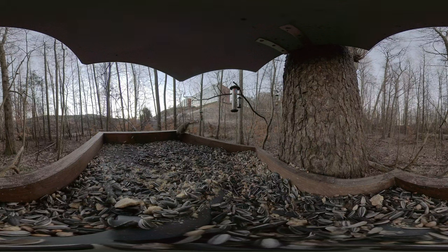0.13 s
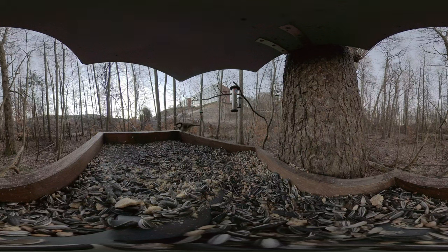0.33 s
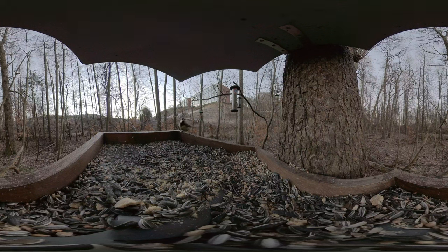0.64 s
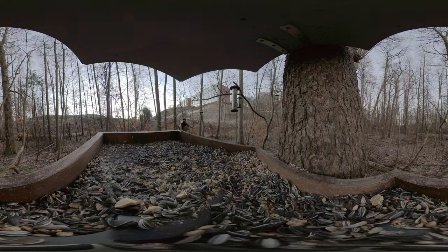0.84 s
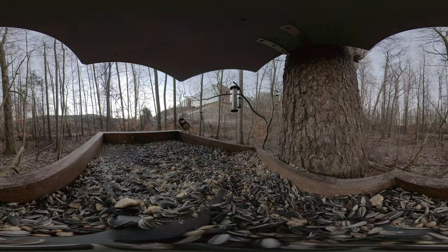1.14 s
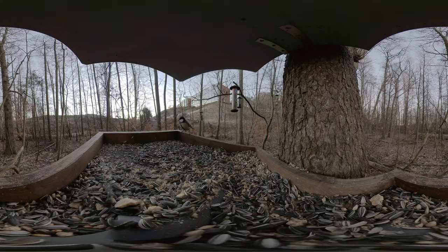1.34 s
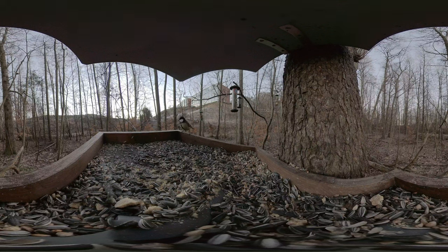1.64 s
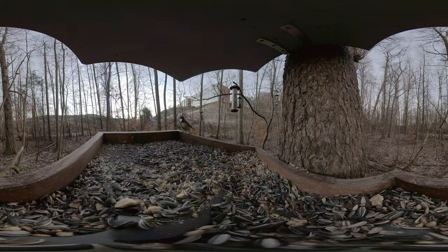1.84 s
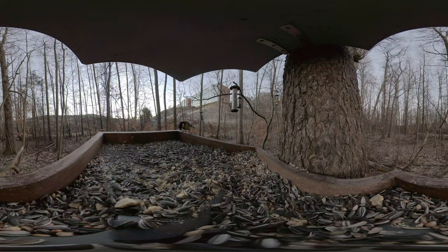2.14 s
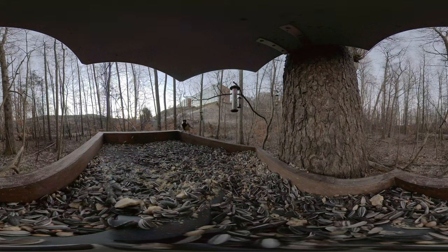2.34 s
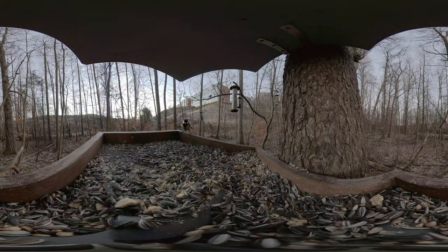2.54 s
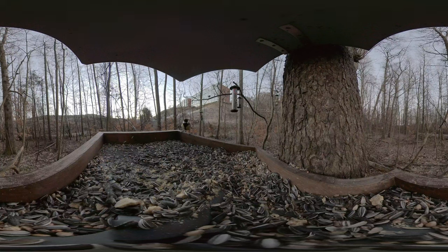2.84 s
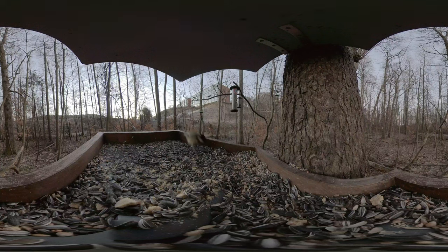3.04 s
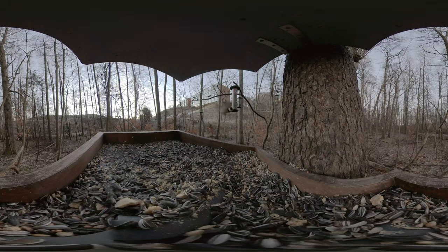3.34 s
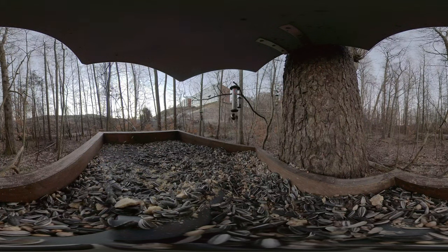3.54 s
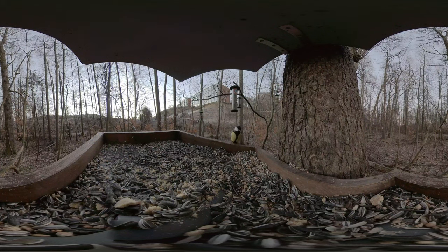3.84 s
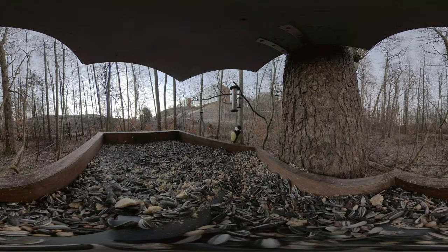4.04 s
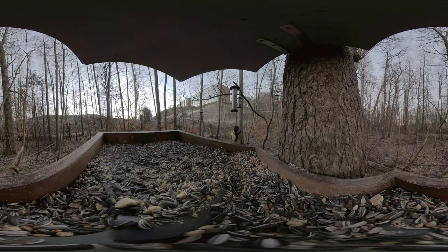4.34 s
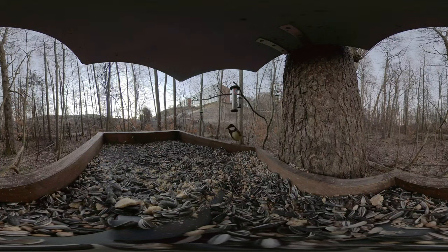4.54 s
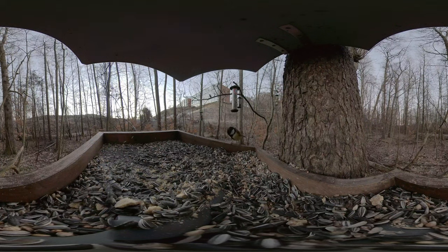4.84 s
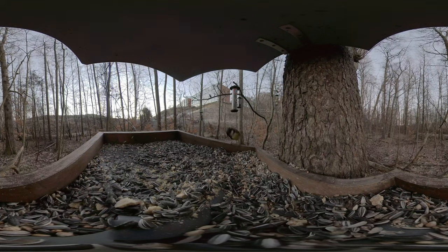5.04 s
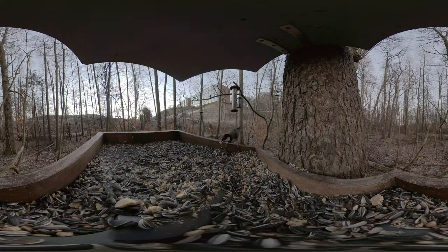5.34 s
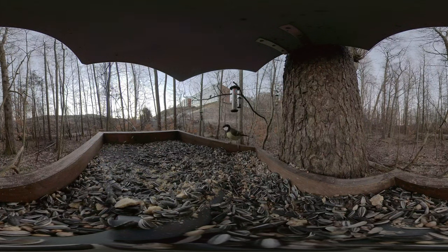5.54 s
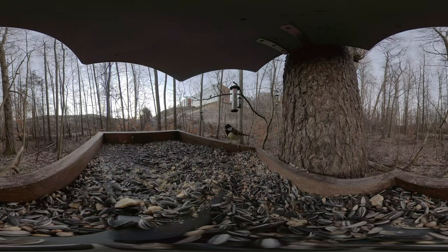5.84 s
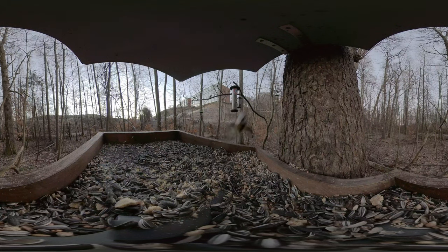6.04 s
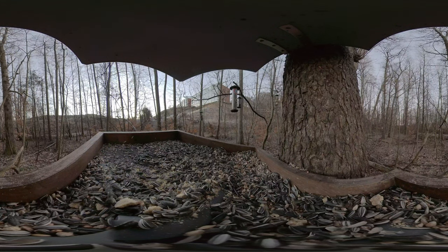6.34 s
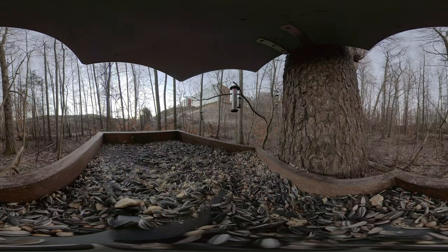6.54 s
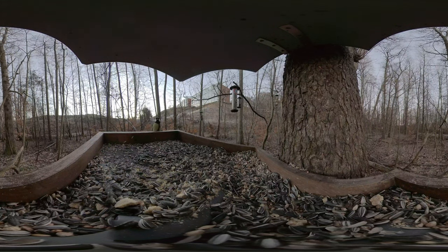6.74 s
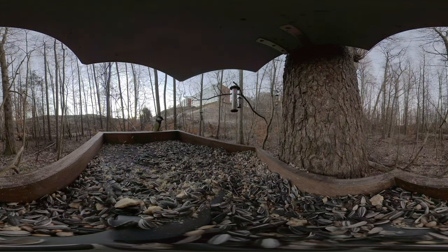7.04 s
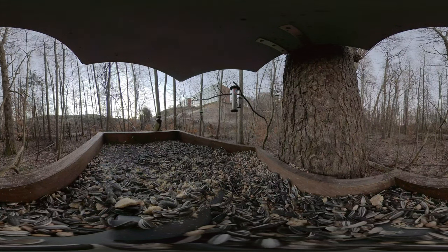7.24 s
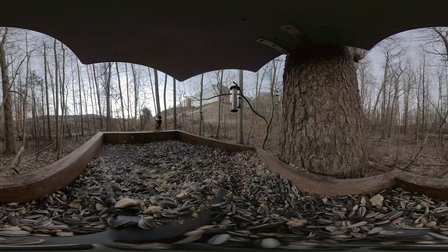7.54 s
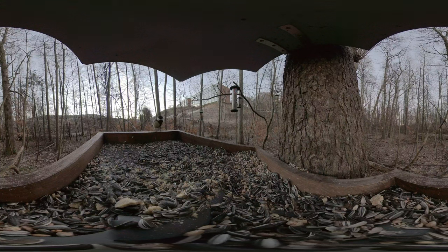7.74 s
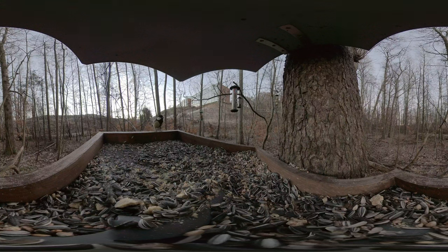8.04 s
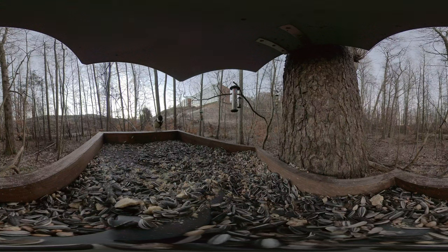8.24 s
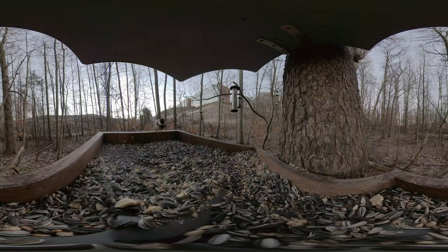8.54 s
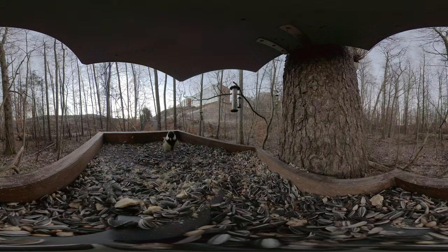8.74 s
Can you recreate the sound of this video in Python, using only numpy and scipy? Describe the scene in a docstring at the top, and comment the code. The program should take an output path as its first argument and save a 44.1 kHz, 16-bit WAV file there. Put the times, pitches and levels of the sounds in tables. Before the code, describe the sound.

Dry seed snaps, light foot knocks on wood and quick wingbeats sound close up, with faint chirps and a far-off vehicle late on.

```python
"""A faint scrape and a dry snap over a low outdoor rush: small birds at a wooden seed tray, close by.
Beaks crack husks, feet knock the tray into ringing, claws drag on the rim, wingbeats push pulses of air.
The rush swells and sinks around their activity; faint chirps come from the winter trees.
Late on, a distant vehicle comes into earshot with rumble, road roar, tyre noise and engine hum."""
import sys
import numpy as np
from scipy import signal
from scipy.fft import rfft, irfft, next_fast_len
from scipy.io import wavfile
from scipy.ndimage import map_coordinates

SR = 44100
rng = np.random.default_rng(int(sys.argv[2]) if len(sys.argv) > 2 else 0)


def file_out(sig):
    """Save sig as 16-bit WAV at sys.argv[1]."""
    # one column per channel
    cols = np.atleast_2d(sig).T
    # limit, then scale
    lim = np.clip(cols, -1, 1)
    pcm = np.round(lim * 32767).astype(np.int16)
    wavfile.write(sys.argv[1], SR, pcm)


N = 392490


def amp(db):
    """Decibels to gain."""
    return 10 ** (np.asarray(db) / 20)


def unit_rms(x):
    """Scale to rms 1."""
    return x / np.sqrt(np.mean(x ** 2) + 1e-20)


def along(points, hz):
    """Interpolate (frequency [Hz], value) points on a log axis."""
    knots_hz, values = np.transpose(points)
    return np.interp(np.log(hz + 1), np.log(knots_hz + 1), values)


def wobble(rate_hz, size=N):
    """Smooth random curve, rate_hz knots a second."""
    knots = rng.standard_normal(int(size * rate_hz / SR) + 4)
    return map_coordinates(knots, [np.arange(size) * rate_hz / SR])


def filtered(x, response):
    """Zero-phase filter with gain response(hz)."""
    size = x.shape[-1]
    padded = next_fast_len(size + SR // 10)
    gain = response(np.fft.rfftfreq(padded, 1 / SR))
    return irfft(rfft(x, padded) * gain, padded)[..., :size]


def pan(left_minus_right_db):
    """Left and right gains, mean 1."""
    gains = amp(np.array([[.5], [-.5]]) * left_minus_right_db)
    return gains / gains.mean(axis=0)


def noise(spectrum, coherence, size=N):
    """Coloured stereo noise, rms 1; left-right coherence is a number or a table over frequency."""
    def response(hz):
        likeness = coherence if np.isscalar(coherence) else along(coherence, hz)
        angle = np.arccos(np.clip(likeness, 0, 1)) / 2
        return amp(along(spectrum, hz)) * np.array([np.cos(angle), np.sin(angle)]).reshape(2, -1)
    mid, side = filtered(rng.standard_normal((2, size)), response)
    return unit_rms(np.array([mid + side, mid - side]))


def add(track, at_s, sound):
    """Mix a sound into the track."""
    part = track[:, max(round(at_s * SR), 0):][:, :sound.shape[-1]]
    part += sound[..., :part.shape[1]]


# Swells of the rush: (time [s], hold [s], level [dB])
RUSH_SWELLS = [(0.121, 0.069, -53), (0.281, 0.078, -49.5), (0.498, 0.34, -52), (1.041, 0.27, -52.5),
               (1.492, 0.35, -51.5), (1.967, 0.049, -51), (2.266, .29, -51.5), (3.107, 0.031, -53),
               (3.183, 0.89, -48.5), (4.494, 0.14, -53), (5.219, 0.35, -50), (5.972, 0.12, -60),
               (6.13, 0.17, -50), (6.476, 0.077, -50.5)]
def rush_gain(rise_s=0.014, sag_db_per_s=4, sink_db_per_s=111, calm_db=-65):
    """Each swell rises fast, sags a little, then sinks back to calm."""
    t = np.arange(N) / SR
    swells = []
    for at_s, hold_s, db in RUSH_SWELLS:
        rise = np.clip((t - at_s) / rise_s, 0, 1)
        sag_db = sag_db_per_s * np.maximum(t - at_s, 0)
        sink_db = sink_db_per_s * np.maximum(t - at_s - hold_s, 0)
        swells.append(rise * amp(db - sag_db - sink_db))
    return np.hypot(np.max(swells, axis=0), amp(calm_db))


# Low rush and fine hiss: (frequency [Hz], density [dB])
RUSH_SPECTRUM = [(25, -21.5), (50, 5.5), (80, 0.5), (170, -7), (270, -4.5), (400, -9), (600, -11),
                 (1000, -16.5), (1500, -24), (2500, -34), (5000, -45.5), (9000, -52)]
HISS_SPECTRUM = [(1200, -16), (2000, -3), (4200, -5), (5300, -28), (6500, -17.5), (8000, -11), (9500, 1),
                 (11500, -0.5), (13300, -1), (14200, -5.5), (16000, -4)]
# Rush balance: (frequency [Hz], left minus right [dB])
RUSH_PAN = [(60, -8), (150, -3.5), (380, -5.5), (950, -3), (2380, -5.5), (5980, -1), (9500, -5.5),
            (15000, -8.5)]
# Background width: (frequency [Hz], left-right coherence [0..1])
OUTDOOR_COHERENCE = [(60, 0.29), (150, 0.093), (380, 0.78), (950, 0.73), (2380, 0.069), (5980, 0.36),
                     (15000, 0.99)]
def outdoor_rush():
    """Low rush that swells and sinks; its hiss swings further than its bass."""
    gain = rush_gain()
    hiss_gain = gain.max() * (gain / gain.max()) ** 1.13
    bass = gain * amp(1.5 + 0.27 * wobble(30)) * noise(RUSH_SPECTRUM, OUTDOOR_COHERENCE)
    hiss = hiss_gain * amp(-15 + .6 * wobble(40)) * noise(HISS_SPECTRUM, OUTDOOR_COHERENCE)
    return filtered(bass + hiss, lambda hz: pan(along(RUSH_PAN, hz)))


# Road roar contour: (time [s], level [dB])
ROAR_LEVELS = [(6.4, -71.5), (6.53, -56.5), (6.72, -61), (6.86, -53), (7.03, -47.5), (7.13, -51.5),
               (7.42, -57), (7.62, -50), (7.78, -55.5), (8.14, -52.5), (8.5, -59.5), (8.66, -54.5),
               (8.9, -59.5)]
def vehicle_gains(arrival_s=6.224, rise_s=0.57, tyre_growth_db_per_s=2.37):
    """Rumble, roar and tyre gains: the tyres follow the roar closely, the rumble hardly."""
    t = np.arange(N) / SR
    since_s = np.maximum(t - arrival_s, 0)
    fade_in = np.minimum(since_s / rise_s, 1)
    times_s, levels_db = np.transpose(ROAR_LEVELS)
    roar_db = np.interp(t, times_s, levels_db)
    swing_db = roar_db - np.median(levels_db)
    rumble = fade_in * amp(-53.5 + 0.17 * swing_db)
    roar = np.sqrt(fade_in) * amp(roar_db)
    tyres = np.sqrt(fade_in) * amp(-65.5 + 0.82 * swing_db + tyre_growth_db_per_s * since_s)
    return rumble, roar, tyres


# Vehicle noise bands: (frequency [Hz], density [dB])
RUMBLE_SPECTRUM = [(25, -20), (50, 5.5), (75, 4.5), (110, 0.5), (160, -4.5), (250, -1), (335, -2.5),
                   (450, -6.5), (650, -16), (1200, -57)]
ROAR_SPECTRUM = [(300, -17), (500, 7.5), (700, 11), (900, 9), (1100, 8.5), (1400, 4), (1900, -31),
                 (3000, -70)]
DRONE_SPECTRUM = [(450, -32), (680, 5.5), (760, 11), (860, -10), (1200, -37)]
TYRE_SPECTRUM = [(800, -55), (1300, 1), (1600, 3.5), (2200, -4.5), (3200, -10), (4500, -23), (6500, -39),
                 (9000, -52)]
# Engine hum: (frequency [Hz], level [dB])
ENGINE_LINES = [(54, -68), (70, -50), (89, -52), (110, -68), (331, -59.5)]
# Vehicle balance: (frequency [Hz], left minus right [dB])
VEHICLE_PAN = [(60, -10), (150, -4.5), (380, -5.5), (950, -2.5), (2380, -10), (5980, -1), (11000, -7.5),
               (15000, -6)]
def vehicle():
    """Distant rumble, road roar and tyre noise over a slightly unsteady engine hum."""
    rumble, roar, tyres = vehicle_gains()
    drone = roar * (roar / roar.max()) ** 0.99  # stands out at the roar's peaks
    sound = rumble * amp(4.5 + 0.097 * wobble(26)) * noise(RUMBLE_SPECTRUM, OUTDOOR_COHERENCE)
    sound += roar * amp(1.5 + 2.1 * wobble(10)) * noise(ROAR_SPECTRUM, OUTDOOR_COHERENCE)
    sound += drone * amp(-2.5) * noise(DRONE_SPECTRUM, OUTDOOR_COHERENCE)
    sound += tyres * amp(3 + 0.22 * wobble(8)) * noise(TYRE_SPECTRUM, OUTDOOR_COHERENCE)
    sound += np.sqrt(rumble * roar) * amp(-13 + wobble(54)) * noise(HISS_SPECTRUM, OUTDOOR_COHERENCE)
    engine_time_s = np.cumsum(1 + 0.00791 * wobble(7)) / SR
    hum = sum(amp(db + wobble(2.35)) * np.sin(2 * np.pi * hz * engine_time_s) for hz, db in ENGINE_LINES)
    sound += hum * tyres / np.percentile(tyres, 90)
    return filtered(sound, lambda hz: pan(along(VEHICLE_PAN, hz)))


# Whistled notes: (time [s], length [s], start pitch [Hz], end pitch [Hz], level [dB])
CHIRP_NOTES = [(.708, 0.011, 6400, 6230, -63), (.730, 0.017, 5580, 5140, -66),
               (1.692, .12, 4550, 4420, -73.5), (1.933, .11, 4410, 4400, -76.5),
               (4.608, 0.028, 3850, 3780, -67), (4.624, 0.011, 3840, 1990, -61.5)]
def tree_chirps(echo_t60_s=0.15):
    """Short falling whistles, blurred by echoes among the trunks."""
    out, t = np.zeros((2, N)), np.arange(SR // 4) / SR
    for at_s, length_s, start_hz, end_hz, db in CHIRP_NOTES:
        progress = np.linspace(0, 1, int(length_s * SR))
        glide_hz = start_hz + (end_hz - start_hz) * progress
        pitch_hz = glide_hz * (1 + 0.011 * wobble(156, len(progress)))
        note = amp(db) * np.sin(np.pi * progress) * np.sin(2 * np.pi * np.cumsum(pitch_hz) / SR)
        trunks = rng.standard_normal((2, len(t))) * amp(-60 * t / echo_t60_s)
        echoes = signal.fftconvolve(note[None], trunks / np.linalg.norm(trunks[0]))
        add(out, at_s, amp(0.5) * note)
        add(out, at_s, amp(-2.5) * echoes)
    return out * pan(-7)


# Decay under the feeder roof: (frequency [Hz], t60 [s])
ROOF_DECAY = [(200, 0.12), (2000, 0.045), (12000, 0.0059)]
def roof_echo(x):
    """The small space between tray and roof rings briefly."""
    hz, t, bins = signal.stft(rng.standard_normal((2, SR // 5)), SR, nperseg=256)
    decay = amp(-60 * t / along(ROOF_DECAY, hz)[:, None])
    _, tail = signal.istft(bins * decay, SR, nperseg=256)
    return signal.fftconvolve(x, tail / np.linalg.norm(tail[0]), axes=1)[:, :N]


# Seed shell, ticking or cracking: (frequency [Hz], density [dB])
SHELL_SPECTRUM = [(900, -32), (1900, -10.5), (2800, -7.5), (4200, -8.5), (5400, -19.5), (7000, -16),
                  (8800, -3), (10500, -1.5), (12500, 2), (16000, -4.5)]
def loose_husks(count=130, attack_s=.0006, t60_s=0.028):
    """Husks shift with tiny random ticks, scaled by the rush and the vehicle's rumble."""
    out, t = np.zeros((2, N)), np.arange(SR // 80) / SR
    rumble, _, _ = vehicle_gains()
    background = rush_gain() + 1.1 * rumble
    envelope = (1 - np.exp(-t / attack_s)) * amp(-60 * t / t60_s)
    for place, strength in rng.random((count, 2)):
        start = int(place * N)
        tick = noise(SHELL_SPECTRUM, 0.62, len(t)) * envelope
        add(out, start / SR, background[start] * amp(-8.5 + 4.9 * strength) * tick)
    return out * pan(1.5)


# Wingbeat bursts: (centre time [s], fade each side [s], air push [dB], eddies [dB], feathers [dB])
FLUTTER_BURSTS = [(0.154, 0.0068, -53, -50.5, -66), (0.324, .018, -44, -63, -78),
                  (2.316, .005, -48, -49, -66), (2.435, 0.0095, -44, -42, -61),
                  (2.494, 0.043, -46, -48, -64.5), (3.316, 0.018, -17, -25, -38.5),
                  (3.384, 0.024, -30.5, -50, -53.5), (3.536, 0.025, -25, -36, -49.5),
                  (3.672, 0.031, -25, -39, -53.5), (5.39, 0.016, -37, -61, -63),
                  (5.417, 0.011, -40, -58, -64.5), (6.147, 0.013, -35, -62, -55),
                  (6.191, .008, -26, -51, -48), (6.205, 0.0091, -23, -44.5, -59),
                  (6.2204, 0.016, -19, -33.5, -50.5), (6.545, 0.06, -39, -56, -82)]
def wing_strokes(per_side=3, spacing_s=.02, jitter_s=.0025, centre_pulse_s=0.0063, outer_pulse_s=.014):
    """Nearly even down- and upstrokes, weaker and softer away from each burst's centre."""
    strokes = []
    for centre_s, fade_s, push_db, eddy_db, _ in FLUTTER_BURSTS:
        for k, lateness in zip(range(-per_side, per_side + 1), rng.standard_normal(2 * per_side + 1)):
            falloff = (k * spacing_s / fade_s) ** 2
            at_s = centre_s + k * spacing_s + (jitter_s * lateness if k else 0)
            length_s = outer_pulse_s if k else centre_pulse_s
            strokes.append((at_s, length_s, push_db - 5.5 * falloff, eddy_db - 8 * falloff))
    return strokes


# Wing turbulence; mid-range body of feather, claw and foot contact: (frequency [Hz], density [dB])
EDDY_SPECTRUM = [(25, -20), (60, 7), (150, -2.5), (230, 2.5), (320, -0.5), (450, -7.5), (620, -8),
                 (1000, -23.5), (2000, -27.5), (5000, -48), (9000, -74)]
BODY_SPECTRUM = [(300, 3), (800, 3.5), (1100, 1.5), (1380, -1.5), (1650, 4), (2000, -2.5), (2700, -4),
                 (3800, -6), (5500, -20), (8000, -23.5), (12000, -27)]
def wingbeats():
    """Each stroke is a suction pulse between two pushes of air, wrapped in eddies and feather flicks."""
    out, t = np.zeros((2, N)), np.arange(-SR // 10, SR // 10) / SR
    for at_s, length_s, push_db, eddy_db in wing_strokes():
        pulse_time = t / (0.36 * length_s)
        push = amp(push_db) * (2 * pulse_time ** 2 - 1) * np.exp(-pulse_time ** 2)
        swirl_gain = amp(eddy_db) * np.exp(-np.abs(t - .002) / (0.59 * length_s))
        eddies = amp(7) * noise(EDDY_SPECTRUM, 1.0, len(t))
        flicks = amp(-15 + 6.1 * np.tanh(wobble(400, len(t)))) * noise(BODY_SPECTRUM, 0.33, len(t))
        add(out, at_s + t[0], push * pan(-12.5) + swirl_gain * (eddies + flicks) * pan(-5.5))
    return out


# Wooden tray resonances: (frequency [Hz], level [dB], t60 [s])
TRAY_MODES = [(695, -1, 0.023), (1100, 4, 0.033), (1193, -4, 0.03), (1590, 5.5, 0.031), (1770, -16, 0.012),
              (2090, -4, 0.0095), (2330, -15, 0.047), (2700, -29, 0.015), (3700, -10.5, 0.018)]
# Feet on the tray: (time [s], knock level [dB], ring centre [Hz], claw level [dB])
FOOTSTEPS = [(0.307, -40.5, 1580, -60), (0.3293, -41.5, 1590, -69), (.7996, -43.5, 1530, -105),
             (2.396, -46, 969, -52), (3.117, -46, 1600, -60), (3.316, -24, 1680, -30),
             (3.787, -32, 1330, -42.5), (3.9557, -39, 1400, -50), (4.5465, -42.5, 1450, -56.5),
             (5.236, -38.5, 1070, -50), (5.291, -39, 1630, -43.5), (5.3171, -40, 1060, -42),
             (5.338, -40, 1610, -43), (5.404, -39.5, 1740, -53), (5.567, -43, 1620, -58),
             (6.145, -38, 1610, -51), (6.19, -35, 1060, -46), (6.7619, -23.5, 1150, -44),
             (6.8145, -40, 1110, -72), (6.9124, -37.5, 1110, -54), (7.6964, -36, 1110, -54)]
def foot_knocks(attack_s=0.00023, scuff_t60_s=0.013):
    """A dry scuff rings the tray's modes; where the foot lands decides which ring most."""
    out, t = np.zeros((2, N)), np.arange(SR // 10) / SR
    mode_hz, mode_db, t60_s = np.transpose(TRAY_MODES)[:, :, None]
    for at_s, db, centre_hz, _ in FOOTSTEPS:
        strength, detune, stereo_lag_rad = rng.standard_normal((3, len(TRAY_MODES), 1))
        phase = 2 * np.pi * mode_hz * (1 + .02 * detune) * t
        place_db = -14 * np.minimum(np.abs(np.log2(mode_hz / centre_hz)), .5)
        decay = amp(mode_db + place_db + 2.4 * strength - 60 * t / t60_s)
        envelope = decay * (1 - np.exp(-t / attack_s))
        modes = [envelope * np.sin(phase + side * stereo_lag_rad) for side in (.5, -.5)]
        ring = np.sum(modes, axis=1)
        scuff = noise(BODY_SPECTRUM, .4, len(t)) * amp(-26 - 60 * t / scuff_t60_s)
        add(out, at_s, amp(db) * (ring / np.abs(ring).max() + scuff))
    return out * pan(-5)


# Bright dry friction: (frequency [Hz], density [dB])
FRICTION_SPECTRUM = [(1500, -49), (4500, -24.5), (6500, -22.5), (8000, -14), (9500, -3), (11500, 1.5),
                     (13500, -2), (16000, -8.5)]
def brush(length_s, t60_s, body_db=-4):
    """A run of tiny catches that starts fast, holds and dies away."""
    t = np.arange(SR // 4) / SR
    attack = np.minimum(t / (0.0024 + 0.033 * length_s), 1)
    release = amp(-60 * np.maximum(t - length_s, 0) / t60_s)
    catches = unit_rms(amp(3.6 * np.tanh(wobble(911, len(t))) + 3.3 * np.tanh(wobble(150, len(t)))))
    treble = noise(FRICTION_SPECTRUM, 0.5, len(t)) * pan(-7)
    body = amp(body_db) * noise(BODY_SPECTRUM, 0.16, len(t)) * pan(-3.5)
    return attack * release * catches * (treble + body)


# Claws over wood and husks: (time [s], length [s], level [dB], body [dB])
CLAW_DRAGS = [(0.098, 0.023, -68, -1), (2.004, 0.055, -72, 3), (3.199, .048, -36.5, -7),
              (3.413, .013, -45, -8), (4.001, 0.047, -59, -2), (5.248, 0.0098, -48.5, -2),
              (5.27, 0.0074, -42.5, -4), (5.35, 0.017, -53.5, 0), (5.98, 0.019, -63, -4.5),
              (6.088, 0.053, -63.5, -6), (6.778, 0.028, -50.5, -8), (8.757, 0.006, -36.5, -5.5),
              (8.765, 0.015, -32, -8.5), (8.82, 0.0042, -38.5, -3.5), (8.833, .02, -50.5, -7.5)]
def claws_and_feathers():
    """Friction: claws drag, each step flicks them, feathers rustle through each flutter."""
    out = np.zeros((2, N))
    for at_s, length_s, db, body_db in CLAW_DRAGS:
        add(out, at_s, amp(db) * brush(length_s, t60_s=0.033 + 3.3 * length_s, body_db=body_db))
    for at_s, _, _, claw_db in FOOTSTEPS:
        add(out, at_s, amp(claw_db) * brush(length_s=0.0069, t60_s=0.037))
    for centre_s, fade_s, _, _, feather_db in FLUTTER_BURSTS:
        add(out, centre_s - fade_s, amp(feather_db) * brush(length_s=2 * fade_s, t60_s=.16))
    return out


# Beak on husk: (time [s], level [dB], body [dB])
HUSK_CRACKS = [(0.1505, -45.5, -2), (.5149, -35, -19), (0.562, -42.5, -7), (.632, -37.5, -7),
               (1.054, -38.5, -3), (1.0995, -40.5, -4), (1.1533, -38.5, -6), (1.2415, -41.5, -1),
               (1.5046, -33, 7), (2.277, -48.5, -16), (2.3174, -49.5, -7), (3.4321, -10, -48.5),
               (3.64, -34.5, -10), (3.7223, -34.5, -11), (3.841, -35, -23), (3.925, -40.5, -22),
               (4.011, -38, -20), (4.0484, -41, -26), (5.509, -46, 4), (5.537, -36.5, -19),
               (7.638, -42, -24), (7.71, -33.5, -30), (8.5853, -41, -23), (8.7011, -35.5, -18)]
def beak_snaps(attack_s=.0002, t60_s=.023):
    """A husk cracks in milliseconds; the less body, the thinner and higher the tick."""
    out, t = np.zeros((2, N)), np.arange(SR // 20) / SR
    envelope = (1 - np.exp(-t / attack_s)) * amp(-60 * t / t60_s)
    body_share = [(3000, 0.68), (8000, 0.59), (13000, 0.016)]  # (frequency [Hz], share [dB/dB])
    for at_s, db, body_db in HUSK_CRACKS:
        shell = noise(SHELL_SPECTRUM, 0.15, len(t))
        crack = envelope * filtered(shell, lambda hz: amp((body_db + 14.5) * along(body_share, hz)))
        add(out, at_s, amp(db + 1.5) * crack / np.abs(crack).max() * pan(-5.5))
    return out


def scene():
    """Birds at the tray over the outdoor background; only the contacts ring under the roof."""
    contacts = beak_snaps() + foot_knocks() + claws_and_feathers() + loose_husks()
    feeder = contacts + amp(-11) * roof_echo(contacts) + wingbeats()
    return feeder + tree_chirps() + outdoor_rush() + vehicle()


def record(dry):
    """Steep low-pass at the recorder's band limit."""
    cutoff_hz = 16000
    return filtered(dry, lambda hz: 1 / (1 + (hz / cutoff_hz) ** 120))


dry = scene()
out = record(dry)
file_out(out)
```